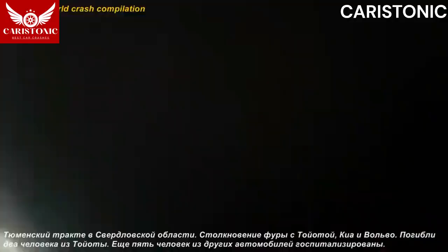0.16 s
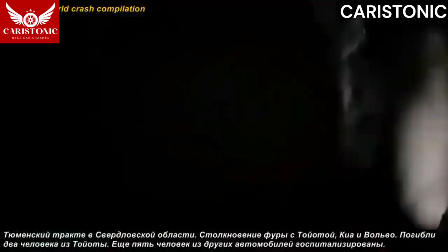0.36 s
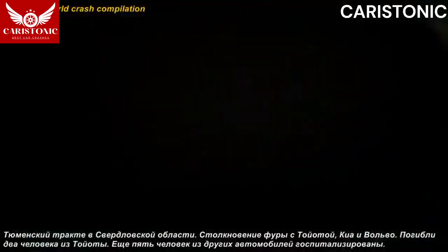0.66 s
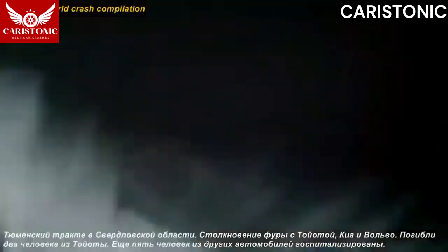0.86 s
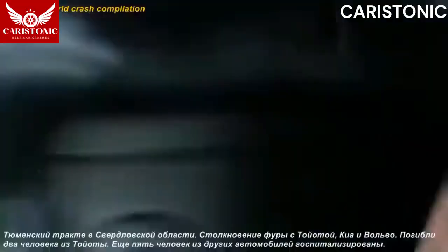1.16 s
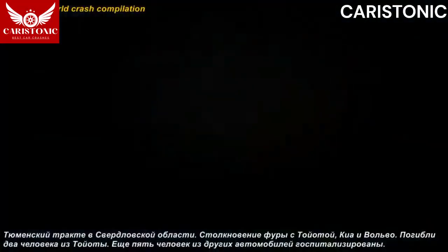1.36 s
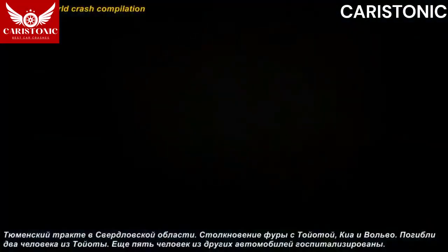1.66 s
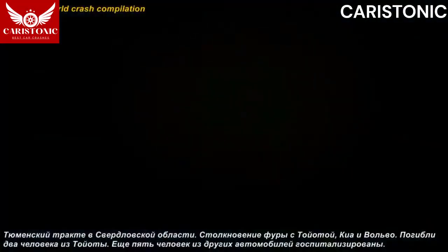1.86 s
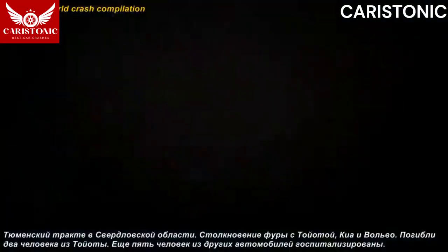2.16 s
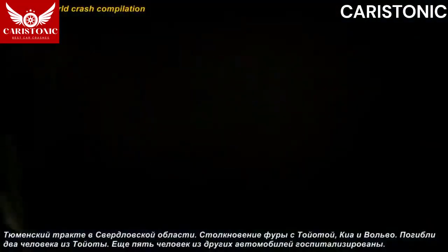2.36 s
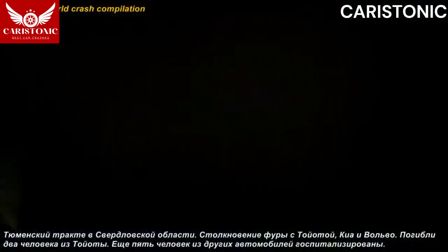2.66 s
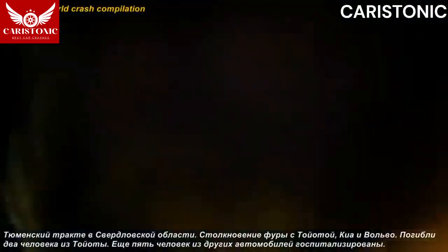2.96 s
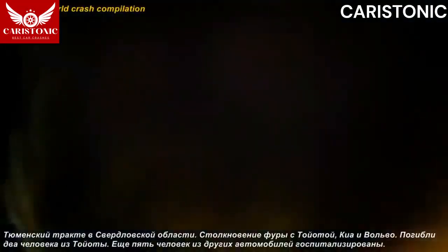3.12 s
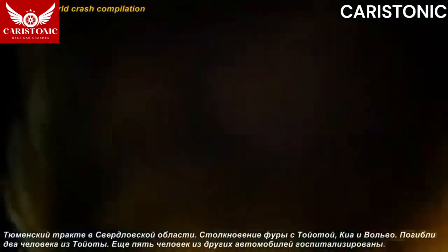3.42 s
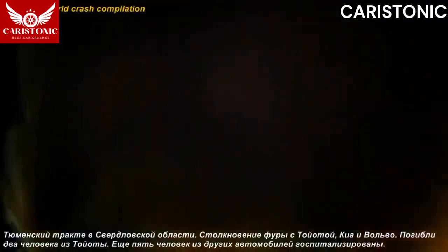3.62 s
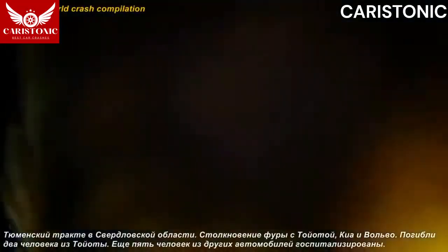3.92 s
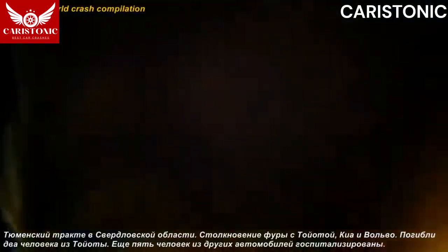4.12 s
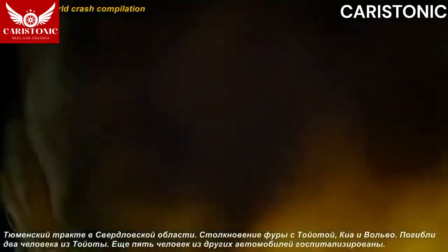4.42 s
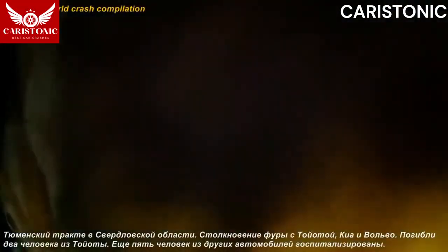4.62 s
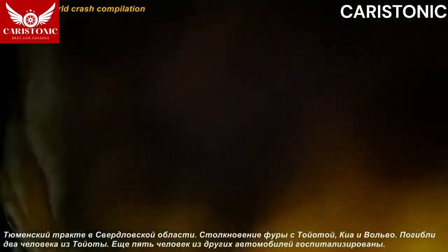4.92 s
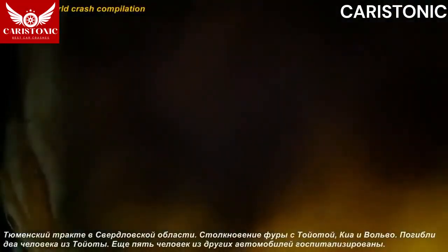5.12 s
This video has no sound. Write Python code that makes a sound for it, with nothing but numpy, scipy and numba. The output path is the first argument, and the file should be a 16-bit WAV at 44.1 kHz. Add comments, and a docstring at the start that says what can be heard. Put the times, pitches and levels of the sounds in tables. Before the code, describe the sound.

Inside a tumbling, crushed car, sharp cracks of plastic trim, metal panels and glass come in rapid bursts, harsh and overloaded. The densest grinding and hardest bangs fall around one to two seconds, with brief squealing scrapes. After about two and a third seconds it drops sharply to scattered clicks, small cracks and low panel knocks, ending with faint glass tinks and almost nothing. Close, thin-sounding small camera microphone with short dull cabin reflections.

```python
"""A dashboard camera tumbles inside a car crushed by a truck. Panels, trim and glass break in dense grains;
single blows ring the piece they hit and overload the microphone; then the wreck settles in cracks and clicks."""
import sys
import numpy as np
from scipy import signal
from scipy.io import wavfile
from scipy.ndimage import uniform_filter1d
from numba import njit

SR = 44100
rng = np.random.default_rng(int(sys.argv[2]) if len(sys.argv) > 2 else 0)


def dump(signal):
    """Clip the signal to [-1, 1] and save it as 16-bit WAV at the path in sys.argv[1]."""
    limited = np.clip(np.atleast_2d(signal).T, -1, 1)
    pcm = np.round(limited * 32767).astype(np.int16)
    wavfile.write(sys.argv[1], SR, pcm)


N = 233055

# grinding between the blows: (s, panels dB, trim dB, shards dB)
GRIND = [(0.0, -22, -20, -43), (.19, -32, -29.5, -42.5), (.3, -37, -22.5, -21), (.4, -36, -37, -46), (.57, -41, -28.5, -42.5),
         (.63, -39, -19, -16.5), (.78, -49, -37, -47), (.82, -9, -19.5, -34), (.87, -18, -7.5, -7.5), (.93, -14.5, -10.5, -12.5),
         (1.0, -11, -11, -17.5), (1.2, -13, -11.5, -30.5), (1.321, -14, -7, -19), (1.47, -14, -4.5, -11),
         (1.54, -18, -6.5, -15), (1.585, -22, -16, -24), (1.66, -29, -18.5, -27.5), (1.74, -27, -16.5, -43), (1.812, -22.5, -8, -12), (1.94, -32.5, -31.5, -42),
         (2.06, -34.5, -29.5, -39), (2.18, -36, -30, -50), (2.28, -28, -24, -39), (2.47, -34.5, -36, -49.5), (2.64, -39.5, -38, -53.5), (2.82, -37, -38.5, -60),
         (2.93, -43.5, -46, -60.5), (3.06, -41.5, -44, -62), (3.22, -44, -51, -65.5), (3.44, -50, -53, -68), (3.6, -46, -49, -59.5), (3.92, -41, -41.5, -58), (4.01, -41, -39, -57),
         (4.06, -43, -31.5, -45.5), (4.11, -46.5, -46.5, -65), (4.4, -49.5, -50, -62.5), (4.61, -50, -51, -65), (4.67, -52, -47, -57.5), (4.79, -54.5, -55, -65.5),
         (5.28, -62, -62, -75.5)]
# (s, level dB, low ring Hz, high ring Hz, high ring above low ring dB, panels above level dB,
#  shards above level dB, rise s, t60 s)
BLOWS = [(.03, -3, 1750, 1950, 14.5, -28, -9, 0.0012, 0.14), (.046, -10.5, 1150, 2240, -7.5, -27, -5, 0.00713, 0.016),
         (.086, -7.5, 1624, 2570, 15, -32, -11, .008, 0.083), (.114, -11.5, 1550, 2719, -2, -17, -23, 0.011, 0.072),
         (.231, 1.5, 1192, 1944, 6, -11, -10.5, .0017, 0.0098), (.271, -6, 1528, 4349, 12, -13, -3.5, .0015, .04),
         (.277, -2, 1526, 1980, 1, -10, -5.5, .004, 0.074),
         (.308, -11, 1639, 1908, -1, -24, -14, 0.011, .027), (.321, -19.5, 521, 1980, 1.5, -7, -18, 0.0089, 0.13),
         (.354, -11.5, 1432, 3240, -23, -15, -15, .0011, .02), (.376, -16, 1638, 1928, -18, -15, -18.5, .012, 0.058),
         (0.447, -16.5, 437.6, 1970, 6, -12.5, -9, .012, 0.065), (.484, -18.5, 1152, 2047, 9, -9.5, -23, 0.0051, 0.035),
         (.532, -25.5, 450, 2640, 21, -19, -16, .0058, .08), (.554, -1.5, 1551, 2970, 4, -10.5, -6.5, 0.0025, 0.057),
         (.585, -1.5, 1686, 3243, 7, -15, -6.5, 0.0095, .12), (.605, -3.5, 980, 3210, -1, -25, -14, .002, 0.021),
         (.629, -3, 1127, 1950, -3, -20.5, -21, .0026, 0.051), (.644, -4, 1208, 2800, -10, -16, -18, .002, 0.027),
         (.655, -2.5, 1074, 2060, 2, -27, -10, 0.00471, 0.043), (.678, -5, 1193, 2028, 1.5, -15, -11, 0.0018, 0.016),
         (.698, -2, 1207, 3105, 1, -18, -9, .012, .05), (.717, -6, 1631, 3000, -1, -23, -10, .002, 0.021),
         (.735, -17, 1590, 2393, 14, -10.5, -26, .0015, 0.079), (.766, -9, 1832, 1832, 3, -37, -7.5, 0.001, 0.051),
         (.776, -7, 1504, 1950, 17, -22, -12, .002, .03), (.812, -18, 451.8, 1856, 11, 6, -28.5, .0085, 0.038),
         (.857, 3, 480.1, 2492, -18, -1.5, -10.5, 0.0019, .035), (.907, 1.5, 1389, 2741, 11, -21, -19, .012, .055),
         (.959, 2, 1495, 3347, 1, -24, -11, .012, 0.039), (1.026, -1.5, 727, 2060, 5.5, -6, -29, .002, 0.037),
         (1.077, -1.5, 500.8, 2047, 2.5, -10, -11, 0.0044, 0.044),
         (1.155, -1.5, 1660, 2588, -14, -19, -17, 0.002064, 0.048), (1.235, -5, 887, 2606, 12, -20, -35, 0.00198, .031),
         (1.361, -9, 868, 2516, 8, -19, -5, .012, .029), (1.391, -10, 823, 2598, 2, -22, -28, .002, 0.055),
         (1.465, 4, 1581, 2796, 6, -14, -12, .002, 0.041), (1.549, -3, 690, 3600, 20, -15, -6, 0.0022, .035),
         (1.597, -3, 1202, 2220, 2, -17, -16, .0015, 0.17), (1.671, -2, 1742, 2981, 1, -19, -27, 0.0015, .028),
         (1.69, -3.5, 1142, 2900, -15, -14, -31, .002, .037), (1.742, -7, 1355, 2290, -5, -11, -16, .002, 0.092),
         (1.781, -9, 1598, 2383, -6, -7, -30, 0.011, 0.0445), (1.802, -9, 1060, 2200, 16, -35, -33, .0013, 0.055),
         (1.888, -11.5, 1528, 2140, 6, -6, -27, .0039, 0.028), (1.925, -3.5, 1760, 2635, 13, -10.5, -8, .0018, 0.052),
         (1.951, -8.5, 1007, 2702, 9, -10, -11, 0.0021, 0.032), (1.966, -10, 1477, 2330, 10.5, -20, -11.5, 0.011, 0.0809),
         (1.989, -8.5, 1203, 3170, 24, -29.5, -11, 0.0067, 0.01), (2.002, -23.5, 1021, 2010, 13.5, -27, -5, 0.011, .033),
         (2.044, -22.5, 1547, 1809, -7.5, -20, -12, 0.0043, 0.19), (2.073, -13.5, 669, 2225, -20, -8, -24, 0.0022, 0.023),
         (2.103, -18, 976, 2208, 7, -13, -13, .008, 0.042), (2.111, -12, 971, 4300, 14, -20, -1.5, .001, .02), (2.118, -3.5, 1081, 2266, 4.5, -13.5, -8, .0014, 0.12),
         (2.141, -4.5, 1370, 2297, 17, -31, -22, .012, 0.011), (2.163, -7, 1684, 2490, 1, -11, -7.5, 0.00097, 0.00799),
         (2.197, -4.5, 1620, 2340, 0, -14, -8, .0017, 0.12), (2.231, -7, 1801, 2270, 0, -16, -8.5, 0.0021, 0.064),
         (2.252, -7.5, 1182, 2620, -2, -12, -7.5, 0.0021, 0.059), (2.288, -23, 1703, 2270, 5, -13, -21.5, .012, 0.068),
         (2.338, -12.5, 1648, 2134, 17, -23.5, -14, 0.00124, .032), (2.507, -26, 1203, 2575, 10, -22.5, -17, 0.013, 0.03),
         (2.585, -22.5, 870, 3137, 13, -28, -11, .0032, .014), (2.673, -28.5, 910, 3270, -9, -8, -15, .011, 0.076),
         (2.698, -25.5, 847, 3230, -21.5, -2, -38, 0.0086, 0.0672), (2.858, -33, 672, 3217, 9, -8, -30, 0.011, 0.049),
         (2.941, -26, 810.4, 3247, 21, -16, -15.5, .002, .046), (2.992, -30, 720, 2300, -2, -12, -27, 0.0018, 0.045),
         (3.005, -30.5, 698, 2210, -1, -18, -25, 0.011, .14), (3.024, -32, 943, 2580, 3, -22, -29, 0.0027, 0.15),
         (3.283, -44.5, 730, 2008, -22, -3.5, -26.5, 0.00797, 0.0394), (3.38, -51.5, 453, 2078, -13, 9, -20, .012, 0.097),
         (3.482, -25, 788, 2381, 6, -29, -39, 0.00058, 0.028), (3.513, -30.5, 558, 2046, 10, -23, -24, 0.009, 0.022),
         (3.54, -27.5, 1450, 3000, 16, -10, -12.5, 0.013, 0.077), (3.586, -33, 454, 3520, 12, -13, -9, .0024, 0.18),
         (3.616, -27.5, 1392, 3017, -6, -9.5, -13.5, 0.015, 0.069), (3.688, -38.5, 716.1, 2080, -11.5, -9, -26, 0.0071, 0.028),
         (3.79, -26, 873, 3520, 19, -20, -10, 0.00077, 0.067), (3.83, -21.5, 1564, 3190, -5.5, -29, -25, .001, .022),
         (3.938, -21.5, 1144, 1908, 4, -9.5, -16, .0025, .02), (4.047, -31, 766.4, 2788, 2, -16, -13, 0.0022, 0.053),
         (4.075, -34, 817, 2982, 2, -20, -11, .012, .05), (4.096, -35, 747, 2760, -3, -13, -28, .0027, .07),
         (4.176, -14, 1078, 3243, -5, -16.5, -29, 0.0012, 0.019), (4.25, -26, 860.7, 2970, -25.5, -7.5, -46, 0.00315, 0.047),
         (4.275, -38, 1124, 1810, -2, -2, -31, 0.0015, 0.02355), (4.303, -33.5, 845, 3500, 3, -10, -15, 0.00339, 0.12),
         (4.324, -31.5, 768, 1988, -4, -8, -13.5, .002, .1), (4.441, -33.5, 1065, 2333, 7, -18, -11, 0.01095, 0.052),
         (4.45, -18.5, 1100, 2300, 11, -11.5, -19, .0015, 0.017), (4.505, -25.5, 1385, 3400, -3, -16.5, -7.5, .001, .04),
         (4.512, -30, 1406, 2614, -12, -22, -17, 0.00974, .13), (4.551, -30, 896, 2510, -9, -15, -25, 0.00203, 0.057),
         (4.986, -31, 1601, 3080, -1, -26, -21.5, 0.001, 0.032)]
DEBRIS = [(15, -48), (25, -20.5), (81, -13), (313, 2.5), (348, 2), (407, 3.5), (1150, 2), (1800, -1), (2270, 0),
          (3030, 2), (4840, -12.5), (11100, -20.5), (12700, -39.5), (16500, -56.5), (22000, -120)]  # (Hz, dB per Hz)
# pitch range and nature of the grains: (from Hz, to Hz, grains a second, cycles a grain, size scatter dB)
PANELS = (200, 700, 1500, 4.4, 2.5)
TRIM = (700, 4200, 6000, 8.6, 3.26)
SHARDS = (3780, 9660, 12000, 2.2, 3.8)
SPLINTERS = (9000, 18000, 8100, 2.4, 2.5)
SPLINTER_DB = -8  # above the shards at full scale
CABIN_T60_S, CABIN_DB = 0.073, -18.5
CLIP = 0.96
DULL_HZ, DULL_DB = 12800, -20  # fixed
TOP_HZ = 15687  # fixed
# glass splinters that ring clear: (s, Hz, dB, t60 s)
TINKS = [(4.655, 2280, -43, 0.14), (4.695, 2320, -47, 0.12), (4.702, 4140, -43.5, 0.21)]
ROAD_HZ, ROAD_DB = 110., -62.5
BASS_HZ = 81
SHELL = (32, 227, 500, 1.1, 4.2)
# a piece dragged along sings for a moment: (s, length s, ring Hz, dB)
SCRAPES = [(0.084, 0.088, 2360, -18), (0.35, 0.06, 1090, -22), (1.01, 0.1, 740, -5.5), (1.301, 0.093, 1130, -13.5),
           (1.794, 0.11, 2280, -4.5), (2.735, .08, 838, -42), (2.819, 0.071, 3110, -49), (3.029, .05, 2298, -40), (3.399, .15, 710, -46),
           (3.711, .1, 780, -41), (4.05, .05, 757, -37), (4.36, .1, 1100, -48.5)]
DRAG_HZ, DRAG_OCTAVES, DRAG_DB = 1422, .6, -12  # otherwise the ring wanders, this far above the trim
RING_DB = -4.5  # the stronger ring, above the level of the blow
# the body shell is jolted and booms: (s, dB)
THUDS = [(.04, -32), (.26, -38), (.66, -39.5), (.83, -24.5), (.94, -17.5), (1.07, -26), (1.28, -23), (1.43, -26),
         (1.87, -32), (2.1, -35), (2.22, -29.5), (2.411, -31), (2.72, -33.5), (2.85, -36), (3.13, -40.5), (3.38, -44),
         (3.57, -45.5), (3.91, -44), (4.35, -37), (4.81, -50.5)]
THUD_RISE_DB_S, THUD_FALL_DB_S = 251.5, 148
ROCKING_DB = -17.5  # between thuds the shell follows the panels
# a loose panel is knocked and rings low: (s, peak dB, Hz)
KNOCKS = [(0.807, -8, 214.8), (0.824, -7, 277), (0.848, -3, 385.3), (0.887, -2, 391.4), (2.348, -20, 453),
          (2.691, -24, 404), (2.75, -23, 315), (2.95, -28, 315), (3.128, -26.5, 195), (3.373, -31, 244),
          (3.88, -28, 313.1), (3.937, -28, 425), (4.175, -30, 448.7)]
TICK_DB, TICK_RISE_S = -1, 0.00071  # first contact of a blow that rises this fast; slower ones tick more softly
KNOCK_T60_S = .09
CRUSH_S, CRUSH_RISES = 0.0039, 2.1  # a blow holds this long before it fades, a sharp snap only so many rise times


def undb(db):
    """Decibels to gain."""
    return 10 ** (np.asarray(db) / 20)


def unit(x):
    """Scaled to rms 1."""
    return x / np.sqrt(np.mean(x ** 2))


@njit
def svf(x, hz, width):
    """Band-pass with a moving centre, gain 1 there."""
    y, b, l = np.empty(len(x)), 0., 0.
    for i in range(len(x)):
        g, k = np.tan(np.pi * hz[i] / SR), width
        v = (b + g * (x[i] - l)) / (1 + g * (g + k))
        b, l, y[i] = 2 * v - b, l + 2 * g * v, k * v
    return y


@njit
def chime(start, hz, cycles, size, length):
    """Every grain is a sine that dies by a factor e in its number of cycles."""
    out = np.zeros(length)
    for k in range(len(start)):
        p = np.exp((2j * np.pi - 1 / cycles[k]) * hz[k] / SR)
        z = size[k] + 0j
        for i in range(start[k], min(length, start[k] + int(5 * cycles[k] * SR / hz[k]))):
            out[i] += z.imag
            z *= p
    return out


def walk(rate):
    """Random levels held 1 / rate s and slewed; spread near 1."""
    k = int(SR / rate)
    return unit(uniform_filter1d(np.repeat(rng.standard_normal(N // 50), k)[:N], k))


def grains(material, count=90000):
    """A steady stream of breaking bits of one material, rms 1."""
    low, high, rate, cycles, scatter_db = material
    when, pitch, spread, big, side = rng.random((count, 5)).T
    start = (np.cumsum(-np.log(1 - when)) / rate * SR).astype(np.int64)
    hz = low + (high - low) * pitch
    at, db = np.transpose(DEBRIS)
    # high grains are shorter, so they start louder for the same energy
    size = undb(np.interp(np.log(hz), np.log(at), db) + scatter_db * np.minimum(-np.log(1 - big), 2.5)) * np.sqrt(hz)
    size = size * np.sign(side - .5)
    heard = start < N
    stream = chime(start[heard], hz[heard], (cycles * (0.67 + spread))[heard], size[heard], N)
    # each stream passes little above the highest pitch of its material
    return unit(signal.sosfilt(signal.butter(3, min(1.28 * high, .4 * SR), fs=SR, output="sos"), stream))


def blows():
    """Force of the blows on panels, trim, shards and both rings, and the pitches of the piece struck last."""
    force, hz = np.zeros((5, N)), np.ones((2, N)) * np.reshape(BLOWS[0][2:4], (2, 1))
    for s, db, low_hz, high_hz, lean_db, panel_db, shard_db, rise, t60 in BLOWS:
        i = max(int(s * SR) - SR // 25, 0)
        t = np.arange(i, min(N, i + SR // 5)) / SR - s
        # swells, holds while the piece crushes; panels then boom longer, shards stop sooner
        lasts = np.array([[1.5], [1.], [.8], [.9], [.7]])
        shape_db = 12 * np.minimum(t, 0) / rise - 60 * np.maximum(t - min(CRUSH_S, CRUSH_RISES * rise), 0) / t60 / lasts
        rings_db = RING_DB - np.maximum([lean_db, -lean_db], 0)
        above_db = np.array([panel_db, -3, shard_db, *rings_db])[:, None]
        force[:, i:i + len(t)] += undb(db + above_db + shape_db) ** 2
        hz[:, int((s - rise) * SR):] = [[low_hz], [high_hz]]
    # each blow splinters into a quick run of snaps
    return np.sqrt(force) * undb(2.1 * walk(220.)), hz


def cabin(x):
    """Short dull reflections of a small crushed space."""
    t = np.arange(SR // 5) / SR
    tail = rng.standard_normal(len(t)) * undb(-60 * t / CABIN_T60_S) * (t > .002)
    tail = signal.lfilter([1], [1, -.6], tail)
    return x + undb(CABIN_DB) * signal.fftconvolve(x, tail / np.sqrt(np.sum(tail ** 2)))[:N]


def tinks():
    """Fading, nearly pure tones."""
    s, hz, db, t60 = np.transpose(TINKS)
    tone = chime((s * SR).astype(np.int64), hz, t60 * hz / np.log(1000), undb(db), N)
    # they skitter as they ring
    return tone * undb(2.5 * walk(90.))


def road():
    """Distant traffic rumble."""
    return unit(svf(rng.standard_normal(N), np.full(N, ROAD_HZ), 1.2)) * undb(ROAD_DB + 2.1 * walk(0.78))


def shell(panel_db):
    """Slow, deep grains of the whole body."""
    power = undb(panel_db + ROCKING_DB) ** 2
    for s, db in THUDS:
        t = np.arange(N) / SR - s
        power = power + undb(db + np.minimum(THUD_RISE_DB_S * t, -THUD_FALL_DB_S * t)) ** 2
    return grains(SHELL) * np.sqrt(power)


def scrape(trim_db):
    """The ring of whatever piece is dragged: noise in one narrow resonance."""
    hz, level = DRAG_HZ * 2 ** np.clip(DRAG_OCTAVES * walk(12.), -2, 2), undb(trim_db + DRAG_DB)
    for s, length, ring_hz, db in SCRAPES:
        near = np.maximum(1 - np.abs(np.arange(N) / SR - s) / length, 0)
        hz, level = np.where(near > 0, ring_hz, hz), level + undb(db) * near ** 2
    return unit(svf(rng.standard_normal(N), hz, 0.12)) * level


def knocks():
    """Short low rings that wobble as the panel moves."""
    s, db, hz = np.transpose(KNOCKS)
    tone = chime((s * SR).astype(np.int64), hz, KNOCK_T60_S * hz / np.log(1000), undb(db), N)
    return tone * undb(2.5 * walk(60.))


def ticks():
    """The sharp first contact of every blow: one cycle at the pitch of its high ring."""
    s, db, _, hz, *_, rise, _ = np.transpose(BLOWS)
    size = undb(db + TICK_DB) * np.minimum(TICK_RISE_S / rise, 1)
    return chime(((s - rise) * SR).astype(np.int64), hz, np.full(len(s), 1.2), size, N)


def scene():
    """Grinding and blows on every material, heard in the cabin."""
    s, *columns = np.transpose(GRIND)
    panel_db, trim_db, shard_db = (np.interp(np.arange(N) / SR, s, c) for c in columns)
    force, struck_hz = blows()
    # stick and slip shakes all the grinding together, and each material a little on its own
    slip_db = 2.1 * walk(60.) + 1.2 * walk(18.)
    out = tinks() + knocks() + ticks() + shell(panel_db)
    for material, db, hit in zip((PANELS, TRIM, SHARDS), (panel_db, trim_db, shard_db), force):
        level = np.hypot(undb(db + slip_db + 1.2 * walk(24.96)), hit)
        out = out + grains(material) * level
    # only violent breaking throws off the finest splinters
    out = out + grains(SPLINTERS) * undb(SPLINTER_DB) * level ** 1.066
    out = out + scrape(trim_db) * undb(slip_db)
    for hz, hit, waver in zip(struck_hz, force[3:], (.13, .07)):
        # a struck piece rings at full strength, its pitch shaken by the crushing
        phase = 2 * np.pi * np.cumsum(hz * (1 + waver * walk(500.))) / SR
        out = out + np.sqrt(2) * np.sin(phase) * undb(2.3 * walk(300.)) * hit
    return (cabin(out) + road())[None]


def record(dry):
    """The microphone loses the bass, overloads, passes little of the highest treble, and the top is cut."""
    thin = signal.sosfilt(signal.butter(2, BASS_HZ, "high", fs=SR, output="sos"), dry)
    flat = thin / (1 + np.abs(thin / CLIP) ** 4) ** 0.3
    dull = signal.sosfiltfilt(signal.ellip(6, .1, 40, DULL_HZ, fs=SR, output="sos"), flat)  # fixed
    mix = np.clip(dull + undb(DULL_DB) * (flat - dull), -1, 1)
    return signal.sosfilt(signal.ellip(8, .2, 70, TOP_HZ, fs=SR, output="sos"), mix)  # fixed


dry = scene()
out = record(dry)
dump(out)
```